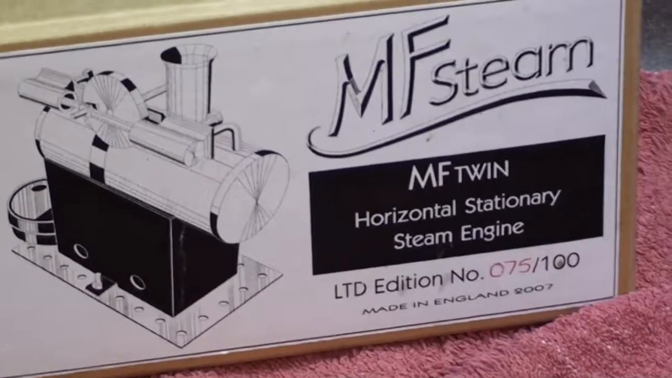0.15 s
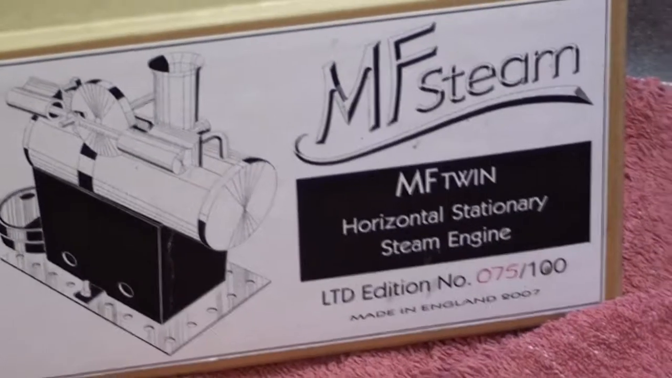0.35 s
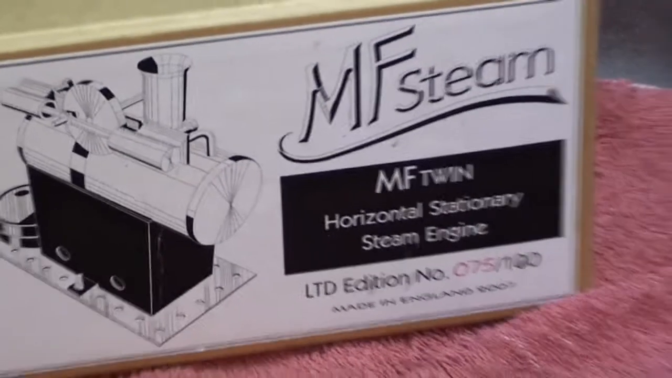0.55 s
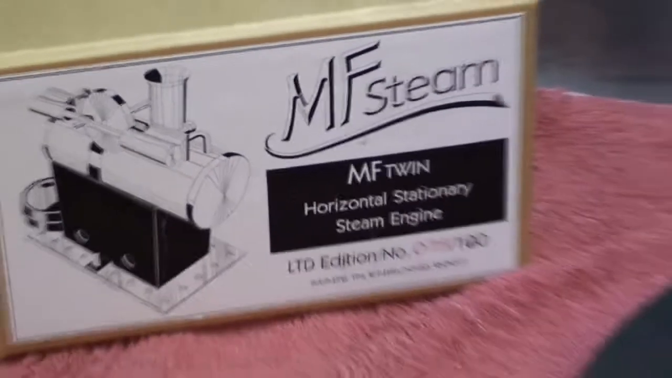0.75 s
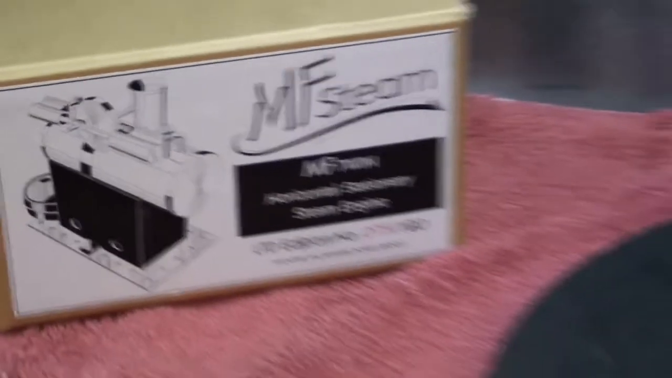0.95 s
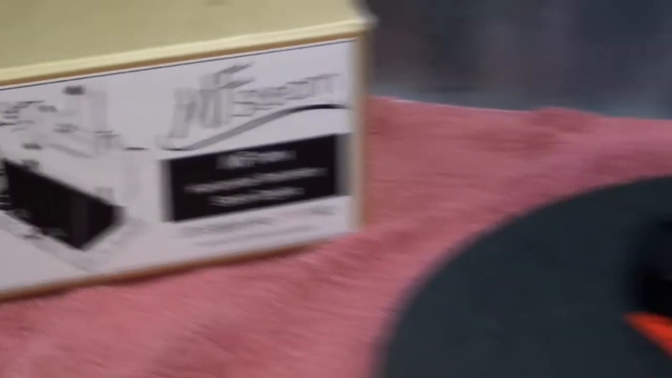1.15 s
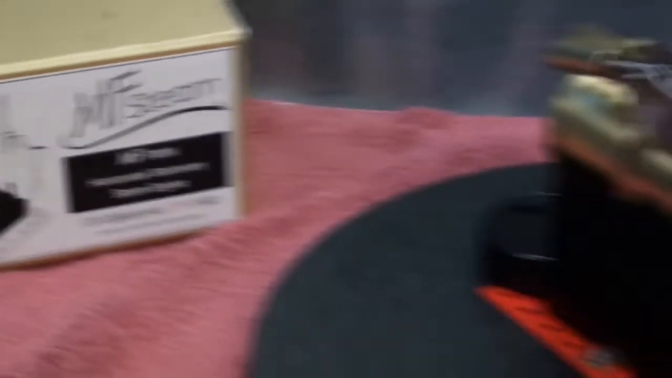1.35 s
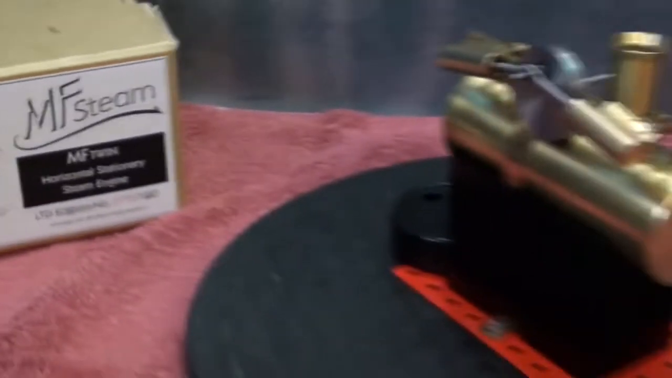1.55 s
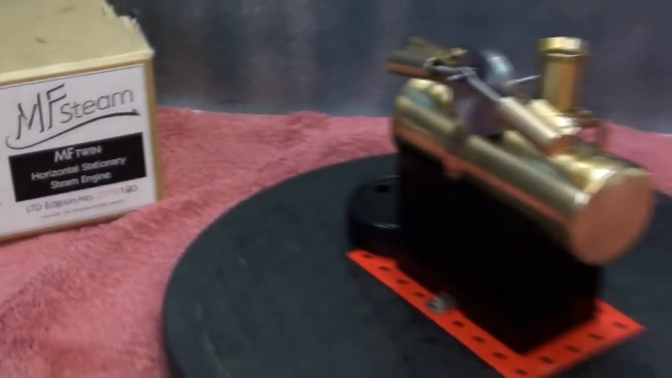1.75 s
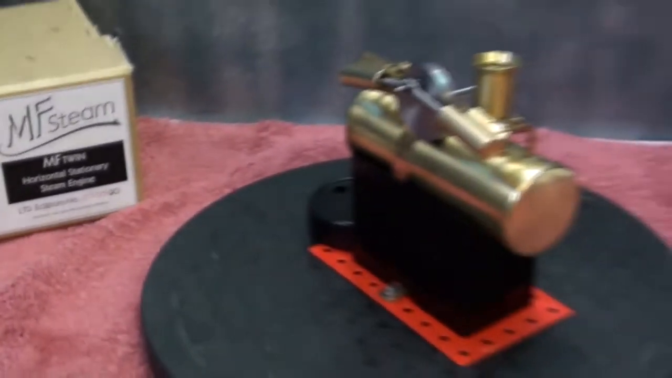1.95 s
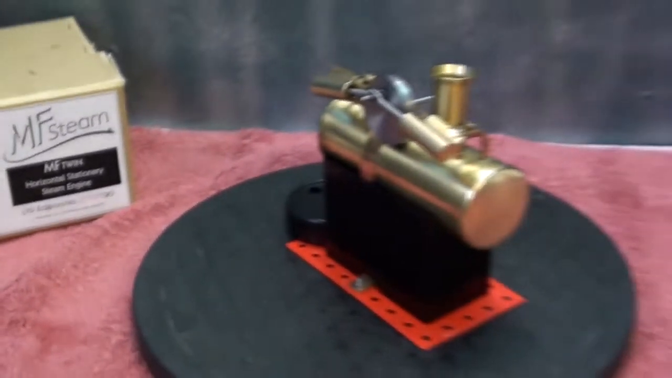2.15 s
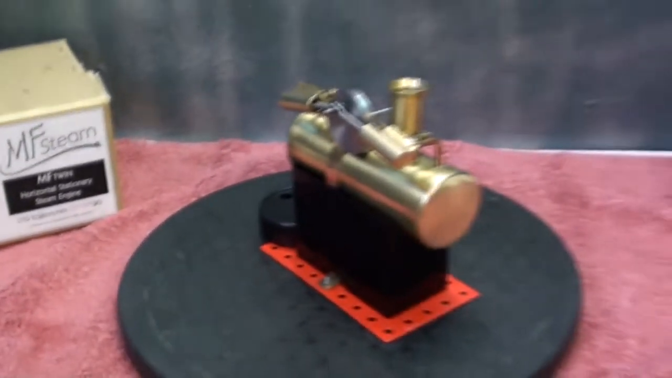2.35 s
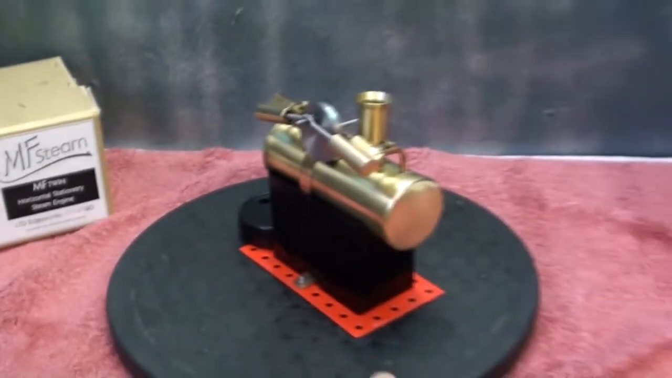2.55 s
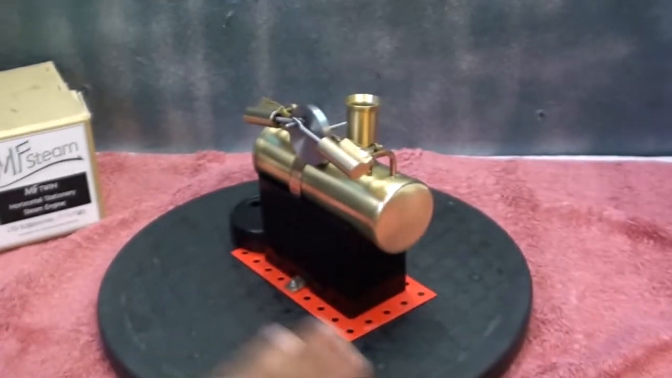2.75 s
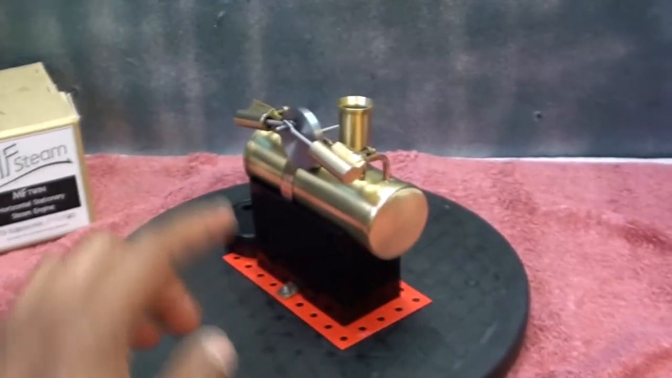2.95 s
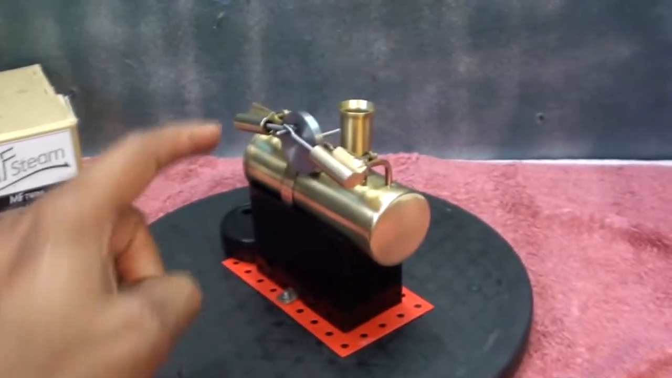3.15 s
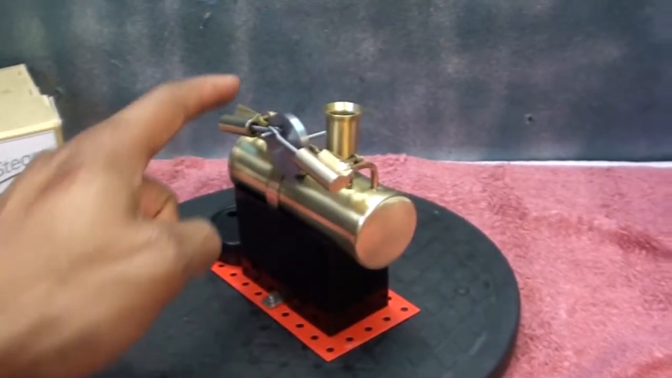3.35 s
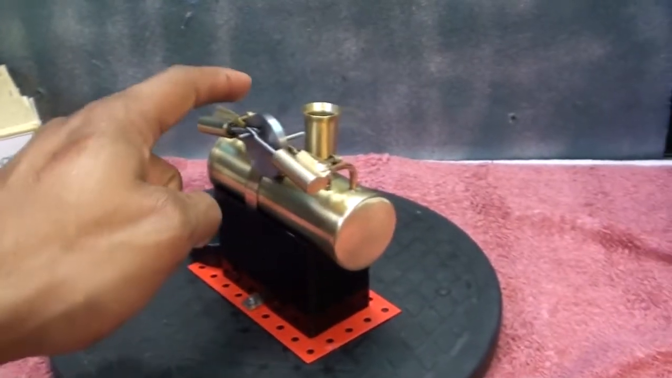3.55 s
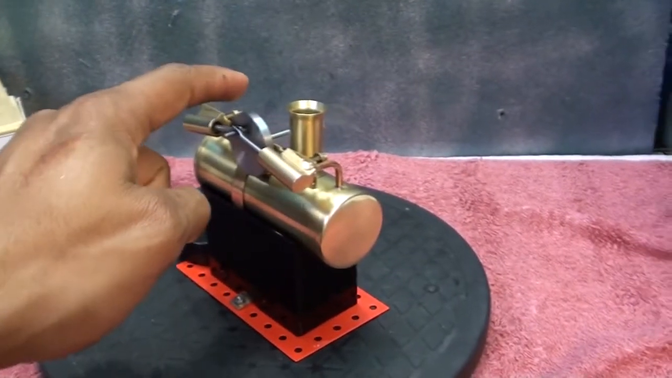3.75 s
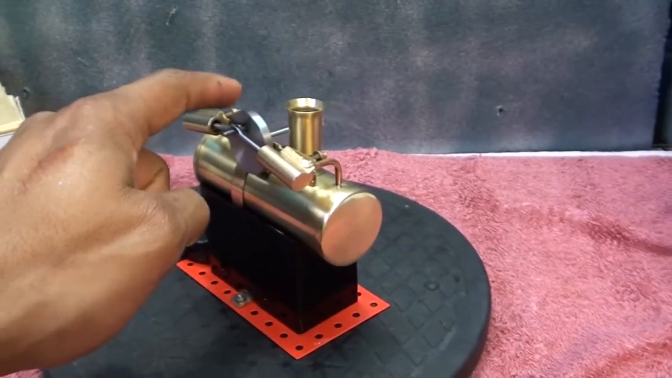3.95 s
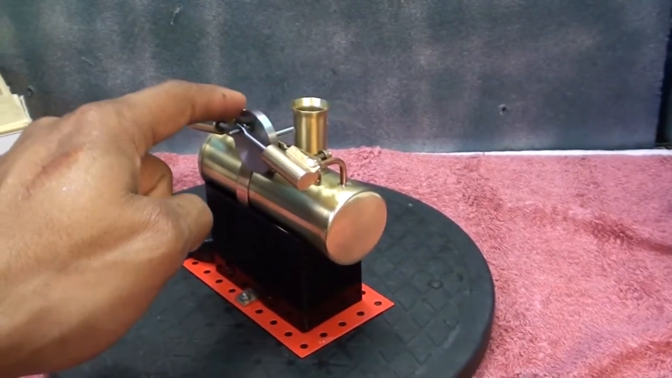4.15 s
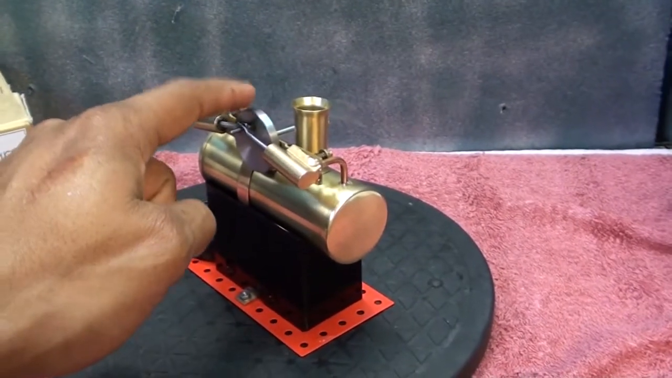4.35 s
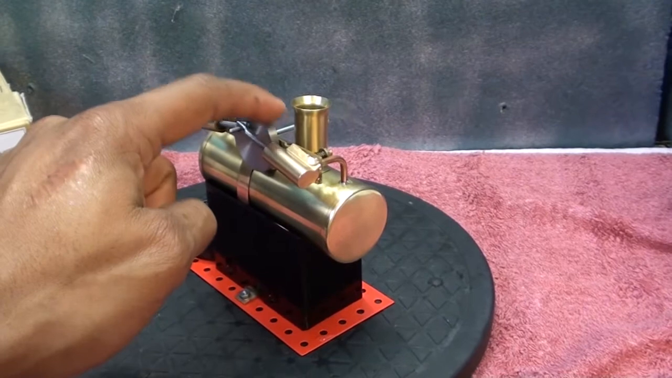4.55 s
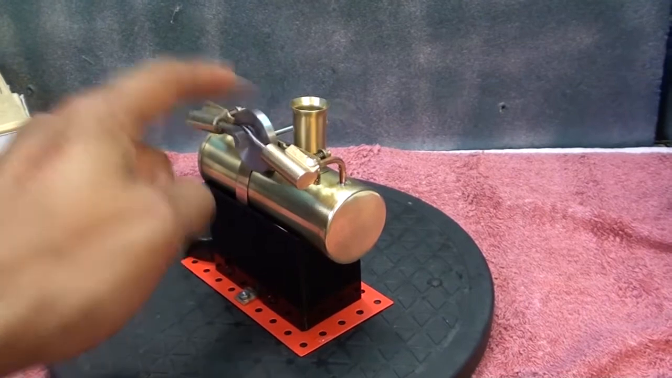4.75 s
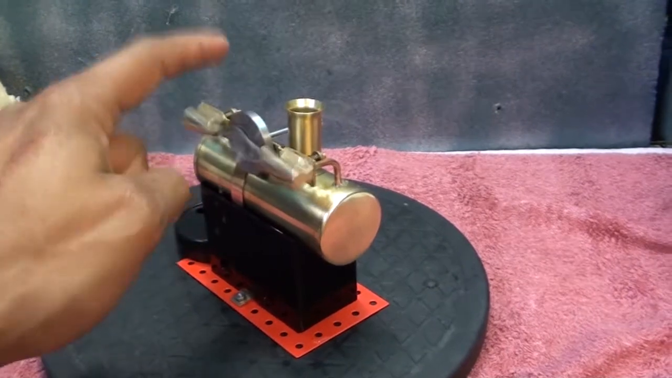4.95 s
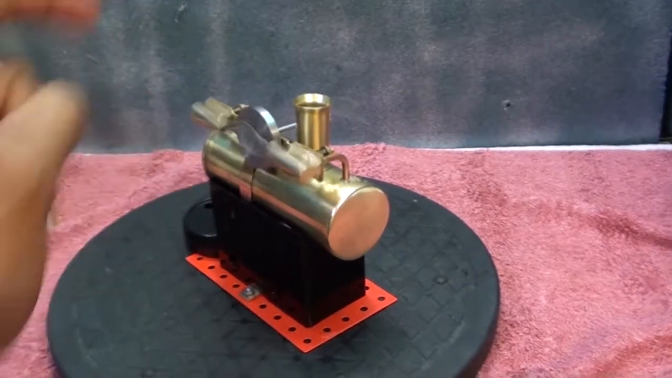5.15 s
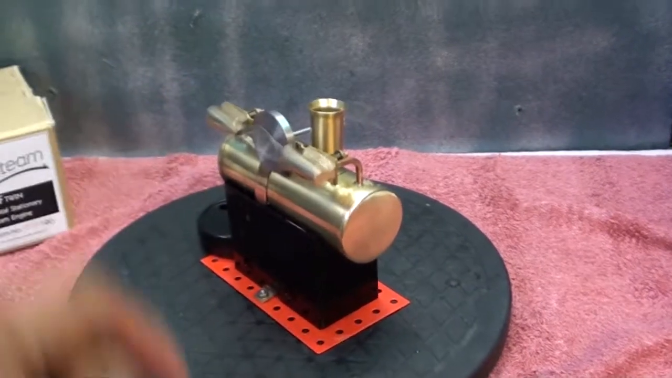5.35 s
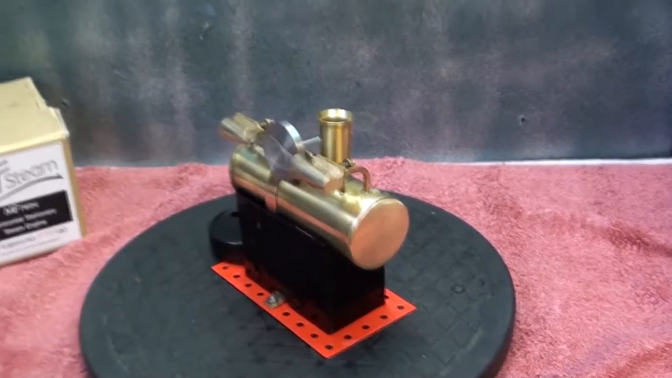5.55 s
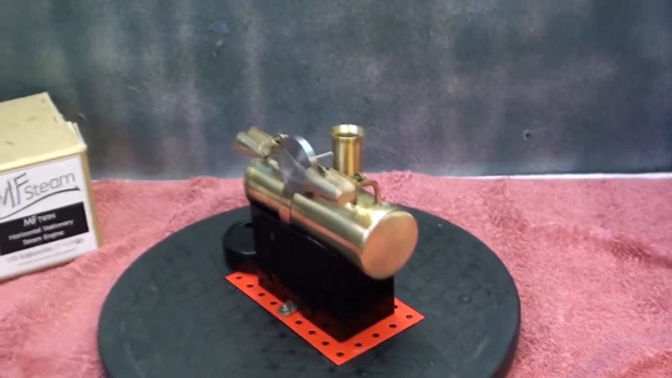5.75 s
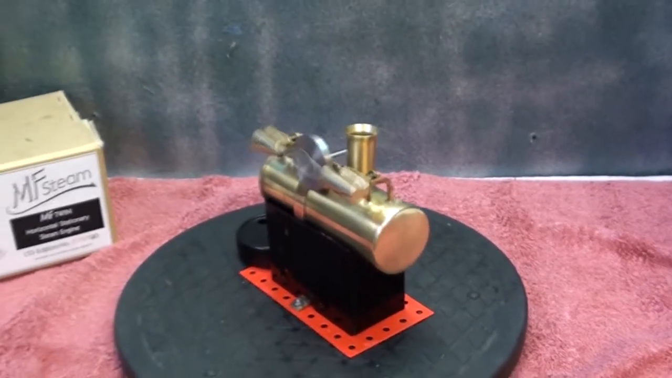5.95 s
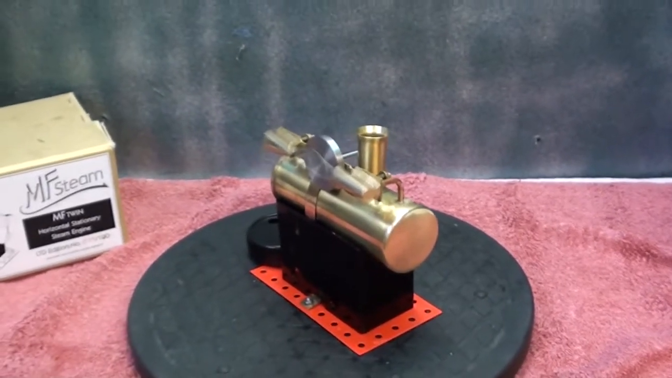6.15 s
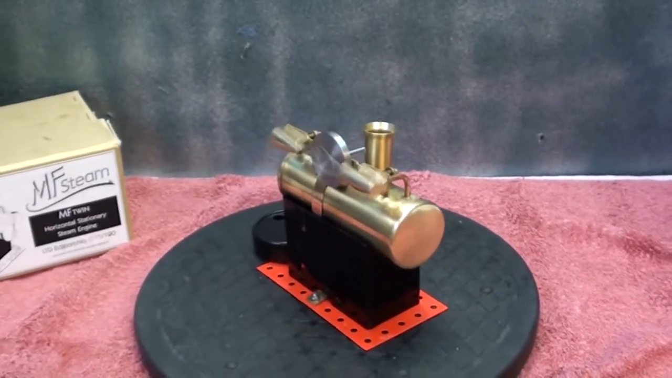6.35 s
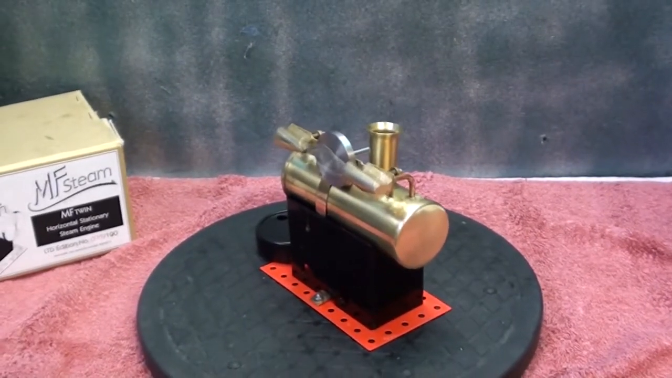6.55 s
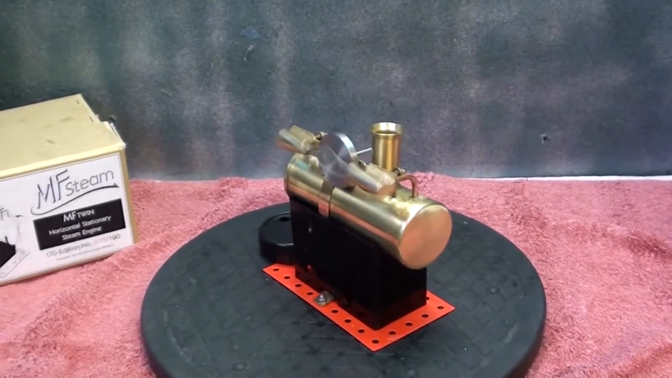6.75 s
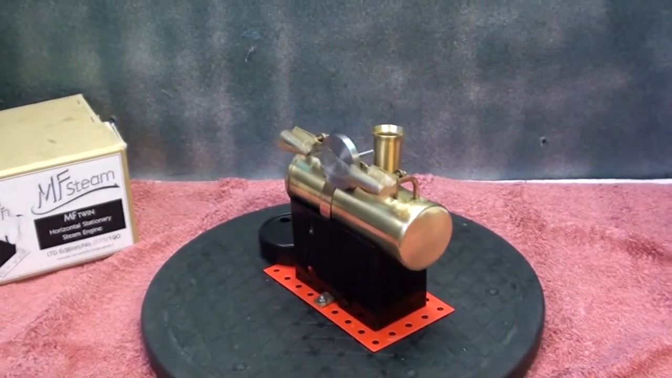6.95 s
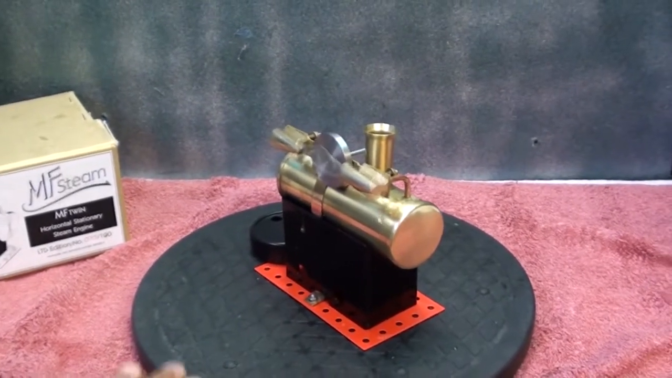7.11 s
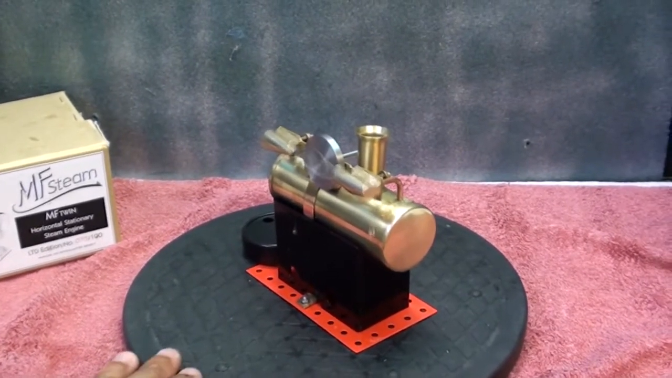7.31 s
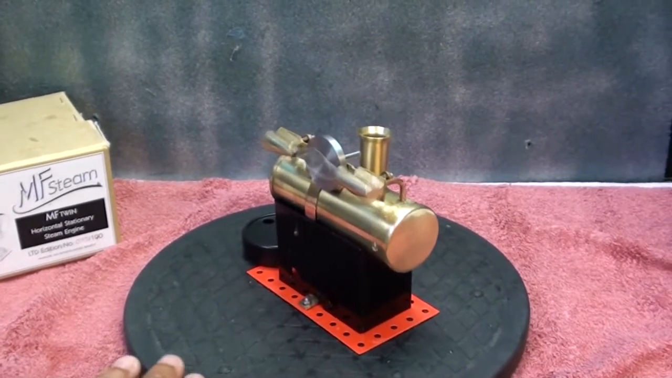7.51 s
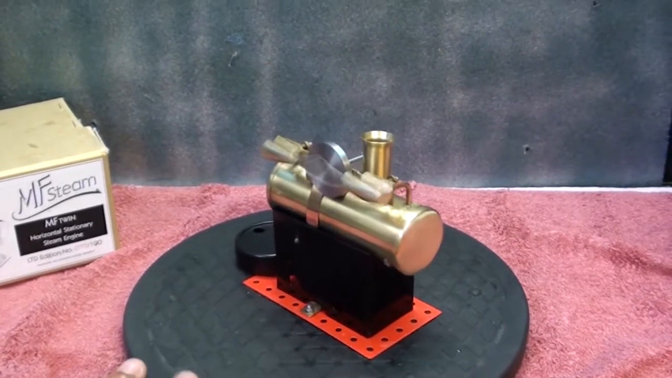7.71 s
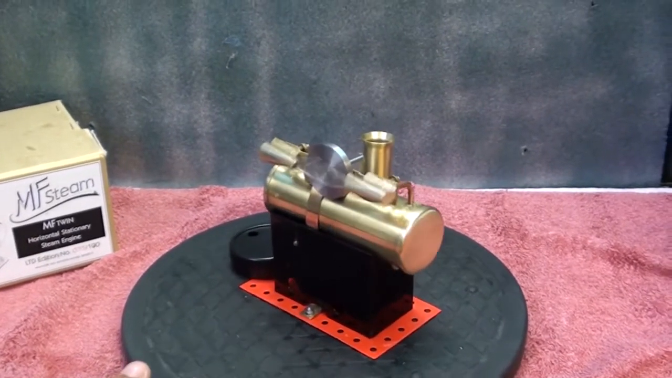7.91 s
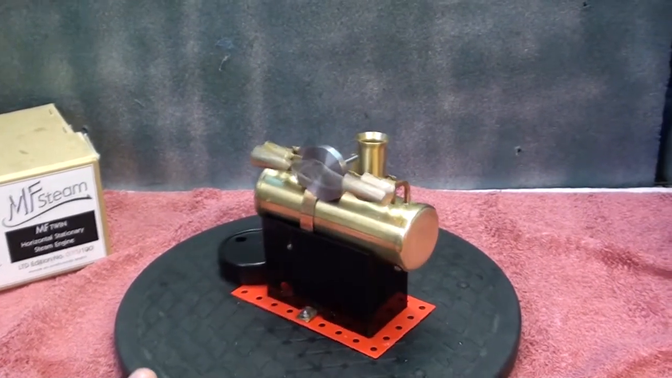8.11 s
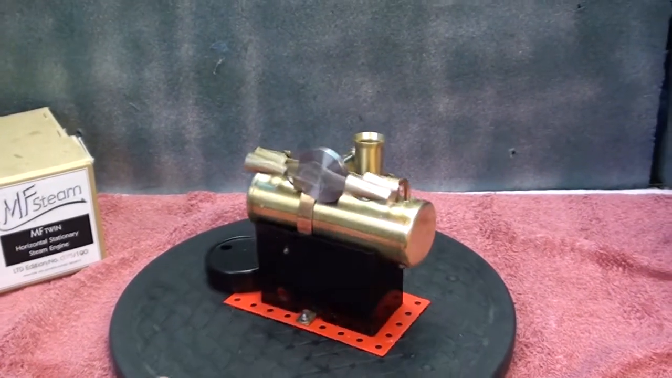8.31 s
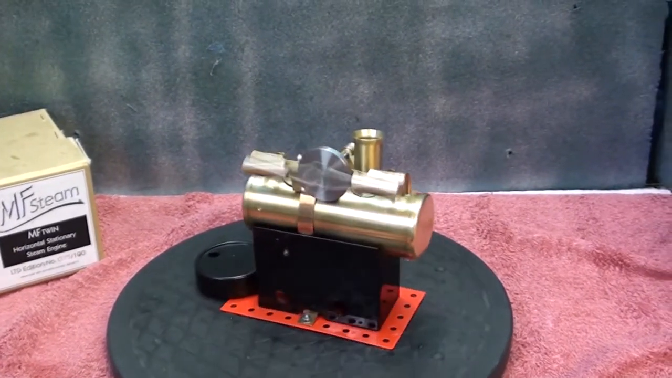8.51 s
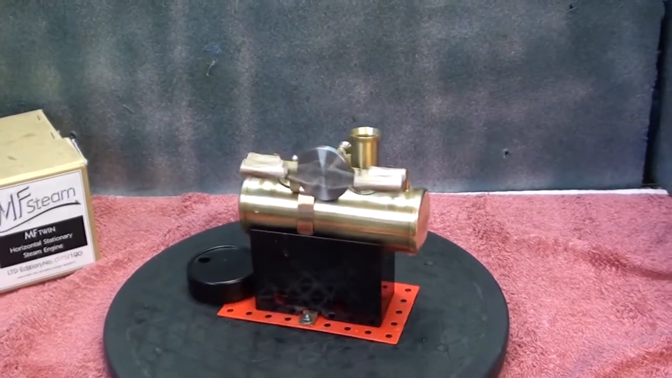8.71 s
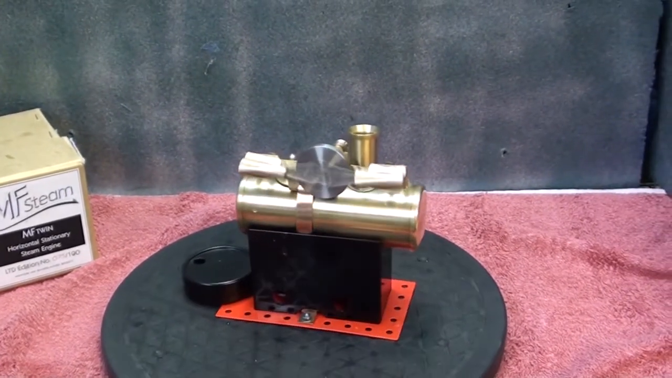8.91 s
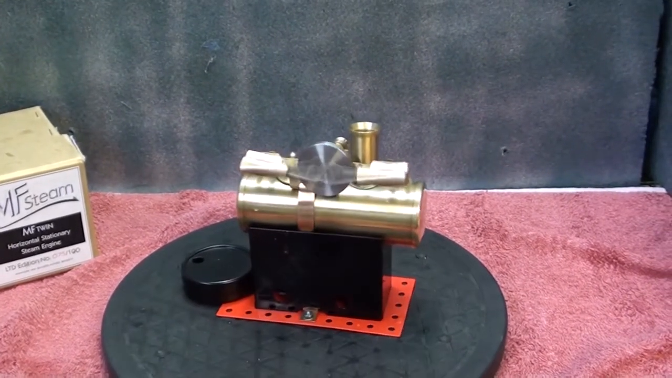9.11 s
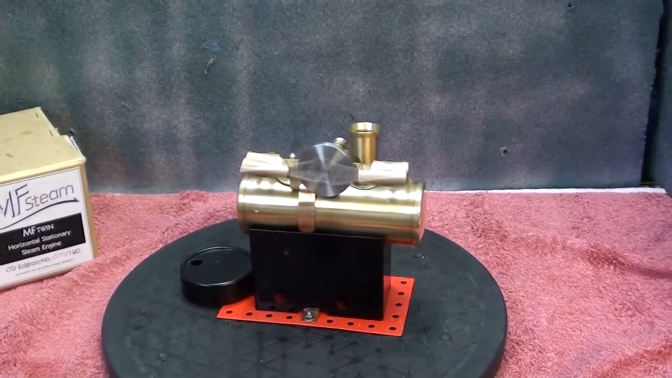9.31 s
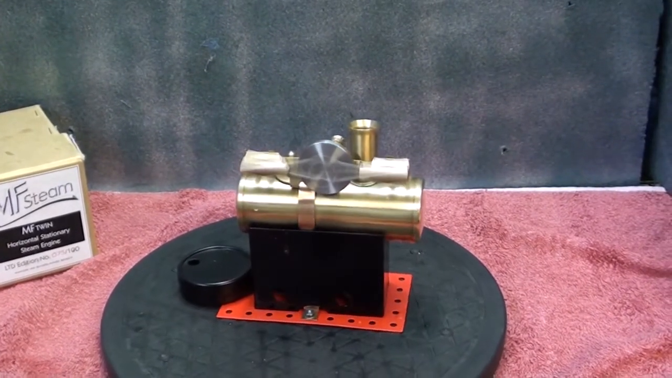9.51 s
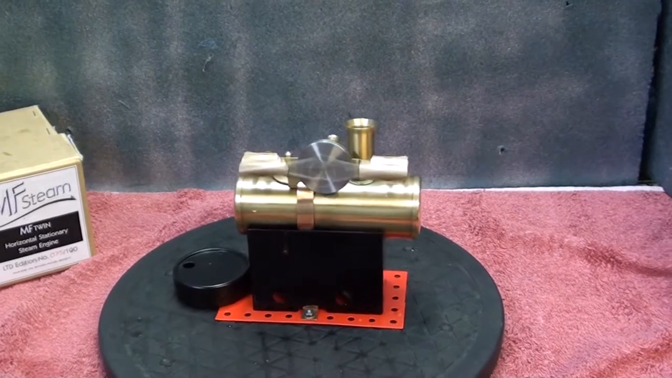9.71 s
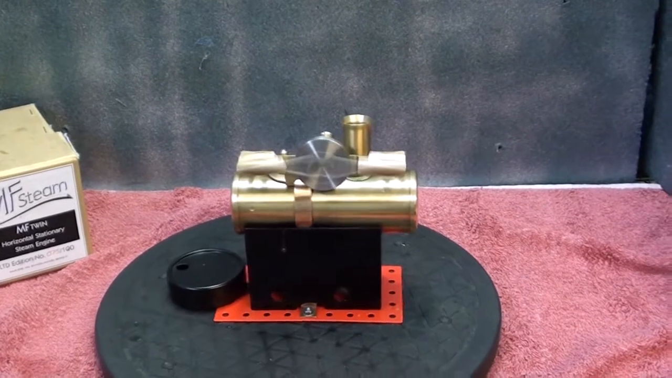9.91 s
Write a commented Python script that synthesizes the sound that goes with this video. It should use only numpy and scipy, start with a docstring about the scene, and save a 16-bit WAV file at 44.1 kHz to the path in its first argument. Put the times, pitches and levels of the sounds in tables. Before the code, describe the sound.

Close up in a small dry room, a model steam engine hisses thinly, with fine crackles, faint squeaks and wet ticks. A hand knocks and snaps sharply, then flicks the flywheel. Loud, ragged water spitting bursts out very fast, gradually drying into rapid, slightly slowing twin puffs with metallic rattle and a low hum, running to the end.

```python
"""A twin-cylinder model steam engine stands on a turntable close to two microphones.
At first wet steam at the port faces sizzles, squeaks and ticks (filtered noise, short pips) amid short
bursts, hand scuffs and knocks and one sharp snap. Then a finger flicks the flywheel: the ports spit
water (noise bursts ringing the ports), and the engine dries to two noise puffs a turn while the cranks
rattle the tin firebox (damped modes) and the piston strokes hum through the base (harmonics)."""
import sys
import numpy as np
from scipy import signal
from scipy.fft import rfft, irfft, next_fast_len
from scipy.io import wavfile
from scipy.ndimage import uniform_filter1d

SR = 44100
rng = np.random.default_rng(int(sys.argv[2]) if len(sys.argv) > 2 else 0)


def generate_wav(sig):
    """Save sig (samples, or channels by samples) to the path in sys.argv[1] as 16-bit PCM at SR."""
    pcm = np.round(np.clip(np.atleast_2d(sig).T, -1, 1) * 32767).astype(np.int16)
    wavfile.write(sys.argv[1], SR, pcm)


N = 439677
TIME = np.arange(N) / SR
FLICK_S = 4.84  # a finger flicks the flywheel


def amp(db):
    """Decibel law: level to amplitude ratio."""
    return 10 ** (np.asarray(db) / 20)


def unit(x):
    """Normalisation to unit mean power."""
    return x / np.sqrt(np.mean(x ** 2) + 1e-20)


def noise(size=N):
    """White noise: independent Gaussian samples."""
    return rng.standard_normal(size)


def curve(rows):
    """Linear interpolation in time of each column of a table."""
    s, *columns = np.transpose(rows)
    return [np.interp(TIME, s, column) for column in columns]


def read(points, hz):
    """Interpolation of a table along a logarithmic frequency axis."""
    table_hz, value = np.transpose(points)
    return np.interp(np.log(hz + 1), np.log(table_hz), value)


def add(mix, s, sound):
    """Superposition of a sound onto the mix from a given time."""
    part = mix[max(round(s * SR), 0):][:len(sound)]
    part += sound[:len(part)]


def colour(x, points, size=4096):
    """Minimum-phase filtering: a causal response of unit energy with the given relative spectrum."""
    level_db = read(points, abs(np.fft.fftfreq(size, 1 / SR)))
    log_gain = np.log(amp(np.maximum(level_db, -100)))
    # the phase of a minimum-phase filter is the Hilbert transform of its log gain
    spectrum = np.exp(np.conj(signal.hilbert(log_gain)))
    response = np.fft.ifft(spectrum).real[:size // 2]
    return signal.oaconvolve(x, response / np.linalg.norm(response))[:len(x)]


def ring(modes, size=4096):
    """Modal superposition: damped modes of alternating sign, together of unit energy."""
    t = TIME[:size]
    response = np.zeros(size)
    for k, (hz, width, db) in enumerate(modes):
        decay = np.exp(-np.pi * width * t)
        response += (-1) ** k * amp(db) * width * decay * np.cos(2 * np.pi * hz * t)
    return response / np.linalg.norm(response)


def whistle(hz, width):
    """Heterodyning: low-passed complex noise is shifted to a narrow band that follows the curve hz."""
    pole = np.exp(-np.pi * width / SR)
    slow = signal.lfilter([1], np.poly([pole, pole]), noise(len(hz)) + 1j * noise(len(hz)))
    carrier = np.exp(2j * np.pi * np.cumsum(hz) / SR)
    return unit((slow * carrier).real)


def grains(per_s, spread_db):
    """Shot noise: random clicks of either sign and uneven size."""
    size = amp(spread_db * np.minimum(rng.exponential(1, N), 3))
    return unit(np.sign(noise()) * size * (rng.random(N) < per_s / SR))


def wander(per_s):
    """Random modulation: a slow drift of unit power through random knots."""
    knots = noise(int(N / SR * per_s) + 2)
    return unit(np.interp(TIME * per_s, np.arange(len(knots)), knots))


def vary(x, spread_db, per_s):
    """Turbulent fluctuation: each frequency band swells and sinks independently."""
    out = 0
    for edge_hz in (2800, 4500, 6500, 9000):
        low_pass = signal.butter(2, edge_hz, fs=SR, output="sos")
        low = signal.sosfiltfilt(low_pass, x)
        out = out + low * amp(spread_db * wander(per_s))
        x = x - low
    return out + x * amp(spread_db * wander(per_s))


def pulses(times, rise, fall, spread_db):
    """Amplitude envelope: a Gaussian swell and an exponential decay at each time."""
    lead = 4 * rise
    t, out = TIME[:SR // 20] - lead, np.zeros(N)
    shape = np.exp(-(np.minimum(t, 0) / rise) ** 2 - np.maximum(t, 0) / fall)
    for s, db in zip(times, spread_db * noise(len(times))):
        add(out, s - lead, amp(db) * shape)
    return out


def running(x):
    """Gating: silent until the flick, then of unit mean power."""
    on = TIME > FLICK_S
    return unit(x * on) * np.sqrt(on.mean())


# spectrum of the room rumble: (hz [Hz], relative_level_db [dB])
ROOM_SPECTRUM = [(25, -37), (85, -5.5), (160, 0.5), (220, -2.5), (300, 2), (420, -4.5), (1200, -6),
                 (3000, -12), (6600, -100)]
# mains hum: (pitch_hz [Hz], level_db [dB])
MAINS_HUM = [(100, -73), (200, -68)]
# modes of firebox and base plate, also struck by the cranks: (pitch_hz [Hz], width_hz [Hz], level_db [dB])
FIREBOX_MODES = [(625.5, 66, -3.5), (837, 26, -14), (1108, 40, -2), (1399, 40, 0.5), (1794, 37, -9.5)]


def background():
    """Diffuse noise and resonance: room rumble, mains hum, burner in the lowest mode; (mid, side)."""
    hum = np.zeros(N)
    for hz, db in MAINS_HUM:
        hum += amp(db) * np.sqrt(2) * np.sin(2 * np.pi * hz * (TIME + rng.random()))
    burner = whistle(np.full(N, FIREBOX_MODES[0][0]), 53)
    rumble = amp(-59.5) * colour(noise(), ROOM_SPECTRUM)
    diffuse_spectrum = [(25, 0), (130, -1.0), (300, 6.0), (1400, 4.5), (3000, -4.5), (12000, -13.0)]
    diffuse = amp(-61) * colour(noise(), diffuse_spectrum)
    return rumble + hum + amp(-67.5) * burner, diffuse


# spectra of the leaking hiss and of puffs and short bursts: (hz [Hz], relative_level_db [dB])
LEAK_SPECTRUM = [(880, -17.5), (2720, -8.5), (4920, -3), (6240, -4), (7540, 3), (8660, -0.5), (13000, -2.5),
                 (16000, -24)]
PUFF_SPECTRUM = [(1180, -27), (2000, -8), (2530, -17), (3090, -4.5), (4080, -8.5), (5160, -2.5), (5990, -5),
                 (7770, 2), (9250, -6), (10900, -6.5), (15100, -22), (16000, -44)]
# short broadband bursts, spurts of steam or touches of a hand: (start_s [s], level_db [dB])
SHORT_BURSTS = [(0.457, -43), (1.067, -39.5), (2.187, -38.5), (3.61, -45), (3.832, -44), (4.153, -41),
                (4.272, -40), (4.421, -41.5)]
# steam squeezing through the water film:
# (start_s [s], length_s [s], start_hz [Hz], end_hz [Hz], width_hz [Hz], level_db [dB])
FILM_SQUEAKS = [(1.097, 1.1, 4520, 5130, 250, -66), (2.838, 0.18, 5200, 4880, 70, -60),
                (3.0, 0.2, 3880, 3640, 60, -65), (3.62, 0.084, 6370, 10600, 1200, -42),
                (3.966, 0.18, 7750, 6500, 120, -58), (4.058, 0.045, 7900, 9400, 700, -46),
                (4.279, 0.27, 6830, 9060, 1700, -49.5)]
LEAK_DB = -49.5  # hiss of the standing engine
BURST_FALL_S, SQUEAK_WAVER_HZ = 0.018, 96


def sizzle():
    """Jet noise and bubble pips: wet steam hisses, crackles and squeaks amid short broadband bursts."""
    hiss = unit(vary(colour(noise(), LEAK_SPECTRUM), spread_db=2.2, per_s=15))
    # tiny bubbles of several sizes, each a short pip
    t = TIME[:SR // 200]
    pip = t * np.exp(-t / 0.00028)
    crackle = np.zeros(N)
    for hz in np.linspace(7200, 10500, 6):
        crackle += signal.oaconvolve(grains(6, 2.8), pip * np.sin(2 * np.pi * hz * t))[:N]
    out = amp(LEAK_DB) * (hiss + amp(-2.0) * unit(crackle))
    t = TIME[:SR // 10]
    for s, db in SHORT_BURSTS:
        burst = noise(len(t)) * np.exp(-t / BURST_FALL_S)
        add(out, s, amp(db) * colour(burst, PUFF_SPECTRUM))
    for s, length, start_hz, end_hz, width, db in FILM_SQUEAKS:
        size = int(length * SR)
        hz = np.linspace(start_hz, end_hz, size) + SQUEAK_WAVER_HZ * wander(35)[:size]
        add(out, s, amp(db) * whistle(hz, width) * unit(np.sqrt(np.hanning(size))))
    return out


def facing(x):
    """Directivity: the highest fizz opens up as the microphones swing round toward the engine."""
    high_pass = signal.butter(2, 11000, "high", fs=SR, output="sos")
    fizz = signal.sosfiltfilt(high_pass, x)
    fizz_db = curve([(.4, -10), (2.2, -2), (4.5, -2.5)])[0]
    return x + (amp(fizz_db) - 1) * fizz


# hands brushing microphones, turntable and flywheel: (start_s [s], length_s [s], level_db [dB])
HAND_TOUCHES = [(0.073, 0.015, -48), (.15, .09, -53.5), (2.597, 0.01, -44), (4.622, 0.1, -51),
                (4.74, 0.12, -51)]


def touches():
    """Friction noise: soft, dull fingertip scuffs made of dense random clicks."""
    press = np.zeros(N)
    for s, length, db in HAND_TOUCHES:
        add(press, s, amp(db) * np.hanning(int(length * SR)))
    dull = [(200, -7), (650, -2.0), (1100, 1), (2000, -5.5), (5000, -6.5), (12000, -42)]
    return colour(press * grains(2800, 1.4), dull)


# the largest bubbles bursting at the ports: (start_s [s], level_db before a common gain [dB], pitch_hz [Hz])
BUBBLE_TICKS = [(0.887, -40, 7030), (1.381, -39, 8140), (1.861, -39, 9400), (3.327, -37, 8100),
                (3.416, -33.5, 9000), (3.483, -37.5, 8500), (3.64, -37, 8040), (3.802, -40, 8800),
                (4.0455, -38, 8900), (4.234, -38.5, 8400), (4.318, -40, 7700), (4.612, -37, 8050)]


def bubbles():
    """Transient excitation: bursting films give short ticks of narrow-band noise."""
    out, t = np.zeros(N), TIME[:SR // 40]
    for s, db, hz in BUBBLE_TICKS:
        tick = whistle(hz + 0 * t, 2400) * np.exp(-t / 0.0022)
        add(out, s, amp(db + 9.5) * tick * (1 - np.exp(-t / 0.00054)))
    return out


# knocks as the hand reaches in and turns the flywheel over: (start_s [s], level_db [dB], pitch_hz [Hz])
HAND_TAPS = [(2.675, -35, 1170), (4.631, -38, 675), (4.646, -38, 725), (4.669, -33, 694),
             (4.773, -37, 1460)]


def taps():
    """Impact: a light knock gives a small click and a few cycles of a damped note."""
    out, t = np.zeros(N), TIME[:SR // 30]
    shape = (1 - np.exp(-t / 0.00051)) * np.exp(-t / 0.0025)
    for s, db, hz in HAND_TAPS:
        click = 0.53 * whistle(hz + 0 * t, 1500)
        add(out, s, amp(db) * shape * (np.sin(2 * np.pi * hz * t) + click))
    return out


# one sharp snap as a hand touches the turntable: (start_s [s], level_db over its first 5 ms [dB])
SNAP = (2.809, -20)
# its spectrum: (hz [Hz], relative_level_db [dB])
SNAP_SPECTRUM = [(300, -34), (1250, -9), (1800, -18), (2280, -2), (3600, 5), (5600, -5), (6800, 2),
                 (8200, -5), (9200, -25)]


def snap():
    """Impulse response: a hand touches the turntable with a dry crack and a few ms of noise."""
    out, t = np.zeros(N), TIME[:SR // 40]
    tail = 0.22 * noise(len(t)) * np.exp(-t / 0.0032)
    crack = colour(signal.unit_impulse(len(t)) + tail, SNAP_SPECTRUM)
    s, db = SNAP
    add(out, s, amp(db) * crack / crack[:SR // 200].std())
    return out


# flywheel position, racing near 25 turns a second, then settling near 20: (time_s [s], angle [turns])
FLYWHEEL = [(4.862, 0), (4.922, 1), (4.968, 2), (5.096, 5), (5.226, 8), (5.42, 13), (5.69, 20), (5.932, 26),
            (6.226, 33), (6.401, 37), (6.583, 41), (6.86, 47), (7.176, 54), (7.591, 63), (7.9093, 70),
            (8.1418, 75), (8.477, 82), (9.497, 103), (10.04, 114)]
SECOND_PORT_TURNS = .445  # the second port opens this far into each turn


def strokes(offset, scatter):
    """Kinematics: times at which the crank passes a given part of its turn."""
    s, turns = np.transpose(FLYWHEEL)
    count = int(turns[-1])
    return np.interp(np.arange(count) + offset + scatter * noise(count), turns, s)


def speed():
    """Differentiation of angle: turns a second of the flywheel."""
    s, turns = np.transpose(FLYWHEEL)
    return np.interp(TIME, (s[1:] + s[:-1]) / 2, np.diff(turns) / np.diff(s))


# water in the exhaust, levels before a common trim:
# (time_s [s], first_port_level_db [dB], second_port_level_db [dB], length_s [s])
EXHAUST_WATER = [(4.87, -33, -32, 0.0084), (5.244, -19, -19, 0.0087), (5.58, -19, -34, 0.0025),
                 (5.796, -18.5, -20.5, 0.0055), (6.15, -20, -50, 0.0039), (6.34, -16.5, -20, 0.0071),
                 (6.607, -19, -48, 0.01), (6.85, -34, -46, 0.0032)]
SPIT_LEAD_S, SPIT_SPREAD_DB = 0.0027, 1  # water leaves just ahead of the steam
SPIT_LENGTH_SPREAD = 0.38  # natural log of length


def port_spits():
    """Periodic ejection: each port opening throws water while any is left; (s, length s, dB)."""
    s, first_db, second_db, length = np.transpose(EXHAUST_WATER)
    ports = [(strokes(0, 0.005), first_db), (strokes(SECOND_PORT_TURNS, 0.029), second_db)]
    rows = []
    for times, db in ports:
        for at, (size, stretch) in zip(times, noise((len(times), 2))):
            if at < s[-1]:
                spit_s = np.interp(at, s, length) * np.exp(SPIT_LENGTH_SPREAD * stretch)
                spit_db = np.interp(at, s, db) + SPIT_SPREAD_DB * size
                rows.append((at - SPIT_LEAD_S, spit_s, spit_db))
    return rows


# loudest bursts from the ports, slugs of water and a few short hard puffs:
# (start_s [s], length_s [s], level_db before a common trim [dB])
LOUD_BURSTS = [(4.84, 0.03, -17.5), (4.895, 0.0052, -18), (4.909, 0.015, -21.5), (4.932, 0.0064, -16.5),
               (4.947, 0.0067, -16.5), (4.966, 0.0064, -17), (4.999, 0.013, -19), (5.02, 0.0077, -17.5),
               (5.051, 0.0036, -19), (5.06, .004, -20), (5.074, 0.003, -15.5), (5.097, 0.0029, -21.5),
               (5.104, 0.0032, -16.5), (5.136, 0.0062, -21), (5.146, 0.013, -19), (5.191, 0.0069, -17),
               (5.229, 0.012, -26), (5.275, 0.0037, -21), (5.294, 0.003, -16), (5.305, 0.011, -19),
               (5.343, 0.012, -17.5), (5.382, 0.012, -16.5), (5.402, 0.013, -20), (5.421, 0.0042, -23),
               (5.482, 0.0096, -17.5), (5.735, 0.0037, -23), (5.747, 0.016, -16.5), (5.792, 0.013, -18.5),
               (5.836, 0.0032, -19), (5.869, 0.014, -20), (5.952, 0.012, -20.5), (5.996, 0.011, -20.5),
               (6.031, 0.011, -20.5), (6.135, 0.0041, -16), (6.767, 0.0023, -19), (7.205, 0.0048, -15),
               (7.849, 0.0055, -18), (7.885, 0.0089, -21), (8.095, 0.0021, -13)]
# spectrum of the spray: (hz [Hz], relative_level_db [dB])
SPIT_SPECTRUM = [(400, -39), (900, -5), (1370, -13), (1990, 1), (2450, -16), (2830, 1.5), (4200, -1),
                 (5040, -1.5), (6110, 1), (8050, 4), (15500, -13.5)]
# resonances of port block and exhaust pipe: (pitch_hz [Hz], width_hz [Hz], level_db [dB])
PORT_MODES = [(2190, 140, -9.5), (2920, 350, -8), (5104, 170, 0)]
PORT_RING_DB, PORT_DETUNE, PORT_SPREAD_DB = -3.5, .025, 3  # detuning as a fraction of pitch
CHIRP_START_HZ, CHIRP_END_HZ, CHIRP_WIDTH_HZ, CHIRP_DB = 6705, 8500, 600, -2.5


def spits():
    """Resonance: sputtering bursts excite retuned port modes; a whistle rises through each burst."""
    spray = colour(noise() + 0.31 * grains(2500, 3.5), SPIT_SPECTRUM)
    out = np.zeros(N)
    for s, length, db in [*LOUD_BURSTS, *port_spits()]:
        t = TIME[:int((length + .012) * SR)]
        part = slice(round(s * SR), round(s * SR) + len(t))
        rise = 1 - np.exp(-t / (0.066 * length))
        shape = rise * np.exp(-np.maximum(t - 0.99 * length, 0) / 0.0012)
        sputter = amp(2.7 * unit(uniform_filter1d(noise(SR // 10), size=70)))[:len(t)]
        modes = []
        for (hz, width, level), (a, b) in zip(PORT_MODES, noise((len(PORT_MODES), 2))):
            modes.append((hz * (1 + PORT_DETUNE * a), width, level + PORT_SPREAD_DB * b))
        jet = shape * noise(SR // 10)[:len(t)]
        port = signal.fftconvolve(jet, ring(modes, size=512))[:len(t)]
        chirp_hz = np.interp(TIME[:SR // 10], [0, length], [CHIRP_START_HZ, CHIRP_END_HZ])
        chirp = whistle(chirp_hz, CHIRP_WIDTH_HZ)[:len(t)]
        burst = shape * (sputter * spray[part] + amp(CHIRP_DB) * chirp) + amp(PORT_RING_DB) * port
        # each burst is given the energy of its envelope
        add(out, s, amp(db - 1.5) * burst * np.linalg.norm(shape) / np.linalg.norm(burst))
    return vary(out, spread_db=2.0, per_s=70)


PIPE_HZ, PIPE_WIDTH_HZ, PIPE_DB = 3100, 23, -20.5  # faint metallic ring of the exhaust pipe
CUT_OFF_TURNS, CUT_OFF_DB = 0.216, 7.5  # each port closes with a small hiss, half a turn apart
DRIP_TURNS, DRIP_DB = 0.647, -14  # stray drops follow the second puff


def exhaust(puff_db, leak_db):
    """Pulsed jet noise: a soft and a snapping port ring the pipe, drip, and hiss as they close."""
    soft = pulses(strokes(0, 0.002), rise=0.0032, fall=0.0025, spread_db=2.0)
    sharp = pulses(strokes(SECOND_PORT_TURNS, 0.011), rise=0.00063, fall=0.0025, spread_db=0)
    drips = pulses(strokes(DRIP_TURNS, 0.1), rise=.001, fall=0.0022, spread_db=4.0)
    jets = (soft + amp(5.5) * sharp + amp(DRIP_DB) * drips) * noise()
    pipe = signal.oaconvolve(jets, ring([(PIPE_HZ, PIPE_WIDTH_HZ, 0)]))[:N]
    puffs = vary(colour(jets, PUFF_SPECTRUM), spread_db=3.0, per_s=30) + amp(PIPE_DB) * pipe
    closing_times = np.r_[strokes(CUT_OFF_TURNS, 0), strokes(CUT_OFF_TURNS + .5, 0)]
    closing = pulses(closing_times, rise=0.0014, fall=0.0017, spread_db=1)
    leak_spectrum = [(1000, -8), (5000, -8), (8000, 1.0), (10000, -15.5), (15000, -36)]
    leak = colour(grains(6000, 4.6) * (1 + amp(CUT_OFF_DB) * closing), leak_spectrum)
    return amp(puff_db) * running(puffs) + amp(leak_db) * running(leak)


# play in the crank: (time_s [s], level_db before later gains [dB], knock_delay after the first puff [turns])
CRANK_SLACK = [(4.84, -44, 0.43), (5.65, -40, 0.55), (6.2, -39.5, 0.41), (6.5, -36, 0.24), (7.2, -35, 0.26),
               (7.8, -34.5, 0.28), (8.9, -33.5, 0.35), (9.15, -41, 0.3), (9.97, -45, 0.24)]
# last stray knocks once the crank runs smoothly: (start_s [s], level_db before later gains [dB])
LATE_KNOCKS = [(9.043, -34.5), (9.281, -33), (9.62, -37.5), (9.669, -33.5)]
# spectrum of chatter and bearing ticks: (hz [Hz], relative_level_db [dB])
RATTLE_SPECTRUM = [(150, -22), (430, -10), (620, 1.5), (1380, 3), (1700, -4.5), (3000, -9.5), (15000, -41)]


def rattle(drone_db):
    """Impact and modal response: slack knocks once a turn, and the firebox swells into a hollow ring."""
    knock_db, slack = curve(CRANK_SLACK)
    times = strokes(np.interp(strokes(0, 0), TIME, slack), 0.016)
    force, box, t = np.zeros(N), np.zeros(N), TIME[:SR // 10]
    blow = (1 - np.exp(-t / 0.00056)) * np.exp(-t / 0.007)
    swell = 1 - np.exp(-t / 0.0057)
    for s, db in [*zip(times, np.interp(times, TIME, knock_db)), *LATE_KNOCKS]:
        add(force, s, amp(db) * blow)
        for hz, width, level in FIREBOX_MODES:
            note = np.exp(-np.pi * width * t) * np.sin(2 * np.pi * (hz * t + rng.random()))
            add(box, s, amp(db + level + 1.6 * rng.standard_normal()) * swell * note)
    chatter = colour(force * grains(7000, 1.6), RATTLE_SPECTRUM)
    # between knocks the bearings tick on, and the lowest mode never comes to rest
    lowest = whistle(np.full(N, FIREBOX_MODES[0][0]), 77) * amp(2 * wander(20))
    bearings = colour(grains(500, 4.2), RATTLE_SPECTRUM)
    drone = running(lowest) + amp(1.5) * running(bearings)
    return amp(12) * box + amp(9.0) * chatter + amp(drone_db) * drone


# spectrum of the shaking base: (hz [Hz], relative_level_db [dB])
SHAKE_SPECTRUM = [(25, -58), (70, -20), (100, -10.5), (155, 2), (200, 4), (270, -3), (380, -16.5),
                  (2000, -76)]
ODD_ORDER_DB = -6  # the two strokes are nearly alike, so odd harmonics of the turn are weak


def shake(level_db):
    """Forced vibration: two piston strokes a turn give a low hum whose harmonics glide with speed."""
    hz = uniform_filter1d(speed(), SR // 4)
    turns = np.cumsum(hz) / SR
    hum = np.zeros(N)
    for k in range(4, 16):
        order_db = read(SHAKE_SPECTRUM, k * hz) + ODD_ORDER_DB * (k % 2) + 2 * wander(3)
        hum += amp(order_db) * np.sin(2 * np.pi * (k * turns + rng.random()))
    rumble = colour(noise(), SHAKE_SPECTRUM)
    return amp(level_db) * (running(hum) + amp(-8.5) * running(rumble))


SPIN_UP_S, SPIN_UP_DB = 0.27, -7.5  # steam and rattle swell from this far down after the flick
WET_UNTIL_S, DRY_BY_S = 5.54, 6.64  # the cylinders warm up and dry out between these times
PUFF_DB, PUFF_PEAK_S, PUFF_FALL_DB_PER_S = -29, 8.3, 1.02  # puffs are strongest at the peak time
STEAM_DB, STEAM_WET_DB = -41, 8  # steam leaking between puffs, and its rise while wet
DRONE_DB, DRONE_WET_DB = -43, 3  # firebox drone, and its rise while wet
SHAKE_DB, SHAKE_DB_PER_TURN_S = -53.5, 1.2  # shaking at 20 turns a second, and its growth with speed


def engine():
    """Superposition of sources: the engine swells after the flick, hisses when wet, shakes when fast."""
    swell_db = SPIN_UP_DB * np.clip(1 - (TIME - FLICK_S) / SPIN_UP_S, 0, 1)
    wet = np.interp(TIME, [WET_UNTIL_S, DRY_BY_S], [1, 0])
    puff_db = PUFF_DB - PUFF_FALL_DB_PER_S * abs(TIME - PUFF_PEAK_S)
    steam = exhaust(puff_db, STEAM_DB + STEAM_WET_DB * wet)
    body = rattle(DRONE_DB + DRONE_WET_DB * wet)
    hum = shake(SHAKE_DB + SHAKE_DB_PER_TURN_S * (speed() - 20))
    return amp(swell_db) * (steam + body) + hum + spits()


# reverberation time of the room: (hz [Hz], decay_s over 60 dB [s])
ROOM_DECAY = [(100, 0.18), (16000, 0.056)]


def room(x):
    """Reverberation: a small room's sparse echoes, the treble dying first."""
    size = SR // 3
    echoes = noise(size) * (rng.random(size) < 2500 / SR) * (TIME[:size] > .004)
    hz, t, bands = signal.stft(echoes, SR, nperseg=256)
    decay = amp(-60 * t / read(ROOM_DECAY, hz)[:, None])
    tail = signal.istft(bands * decay, SR)[1]
    return signal.oaconvolve(x, tail / np.linalg.norm(tail))[:N]


# how unlike the two microphones hear the engine: (hz [Hz], side_less_mid_db [dB])
STEREO_SPREAD = [(150, -37), (1300, -18), (2400, -37), (4400, -11), (15000, -27.5)]


def scene():
    """Mid-side stereo: the engine at arm's length, heard by two closely spaced microphones."""
    ambience, diffuse = background()
    near = facing(sizzle()) + touches() + bubbles() + taps() + engine()
    direct = near + snap()
    mid = direct + amp(-16) * room(near) + ambience
    # a quarter-cycle shift: the microphones differ in phase rather than in level
    size = next_fast_len(N)
    spread = amp(read(STEREO_SPREAD, np.fft.rfftfreq(size, 1 / SR)))
    skew = irfft(1j * rfft(direct, size) * spread, size)[:N]
    side = skew + diffuse
    return np.array([mid + side, mid - side])


EDGE_HZ = 16000


def record(dry):
    """Band limitation: a linear-phase low-pass removes what lies above the edge."""
    low_pass = signal.firwin(255, EDGE_HZ, window=("kaiser", 9), fs=SR)
    return signal.oaconvolve(dry, low_pass[None], "same")


dry = scene()
out = record(dry)
generate_wav(out)
```